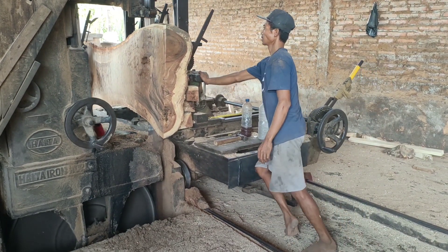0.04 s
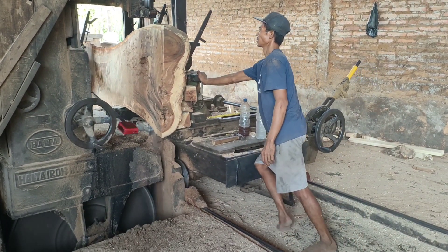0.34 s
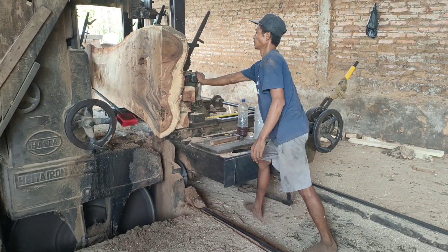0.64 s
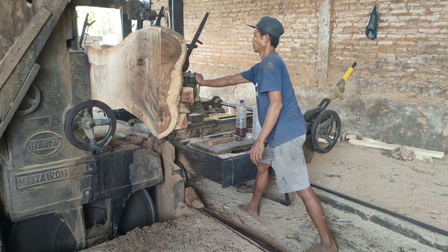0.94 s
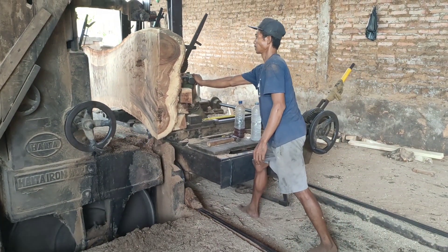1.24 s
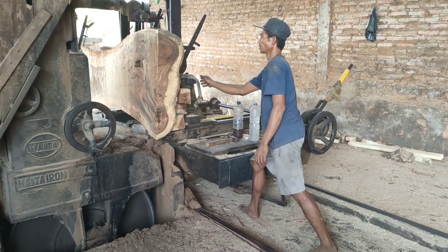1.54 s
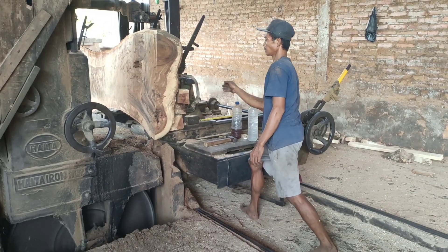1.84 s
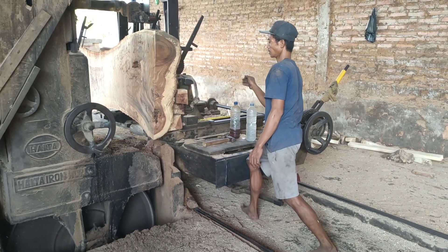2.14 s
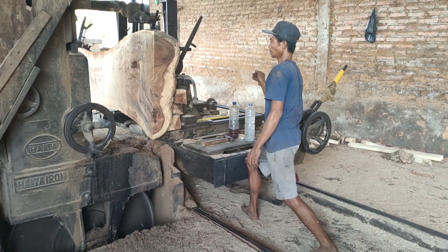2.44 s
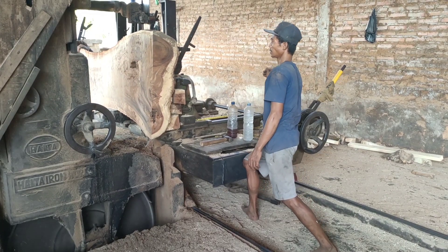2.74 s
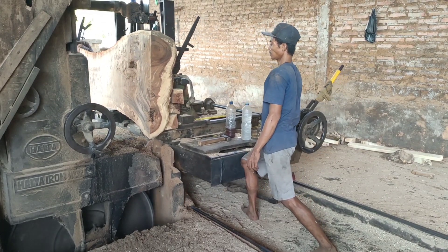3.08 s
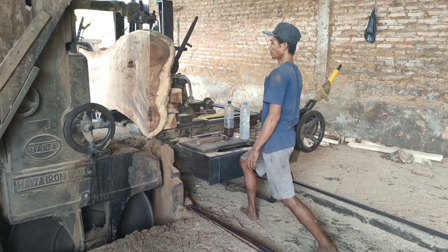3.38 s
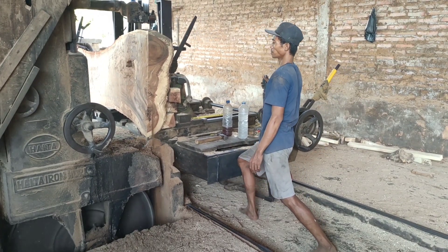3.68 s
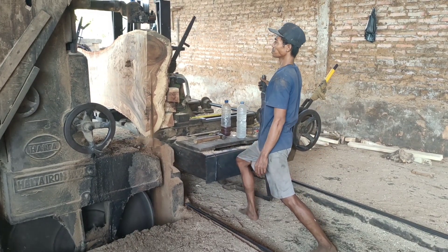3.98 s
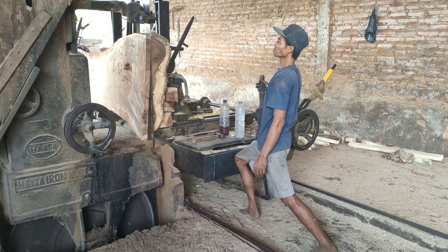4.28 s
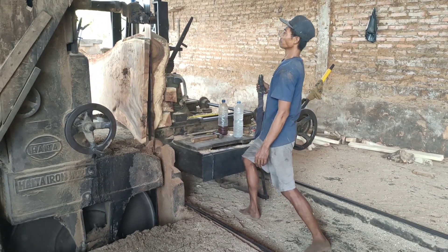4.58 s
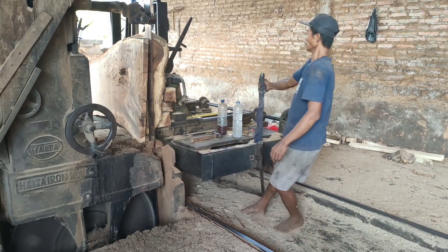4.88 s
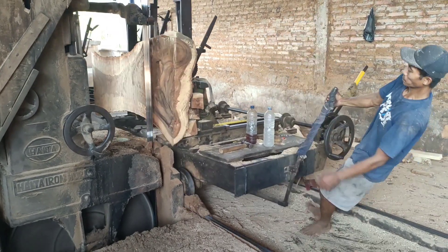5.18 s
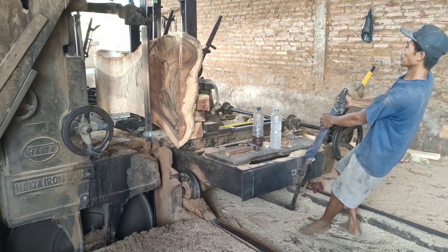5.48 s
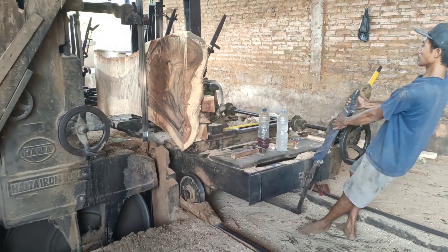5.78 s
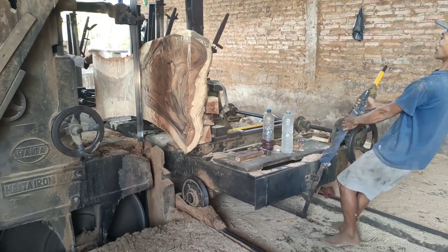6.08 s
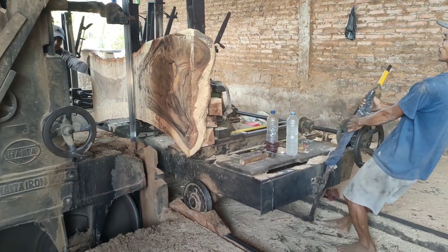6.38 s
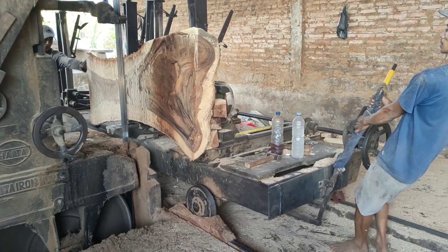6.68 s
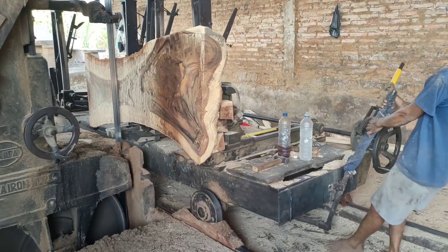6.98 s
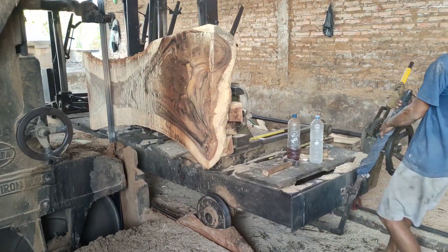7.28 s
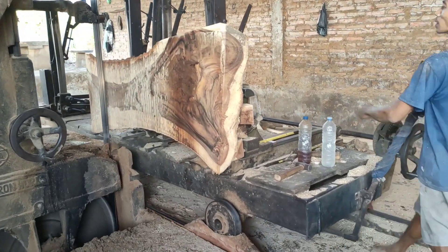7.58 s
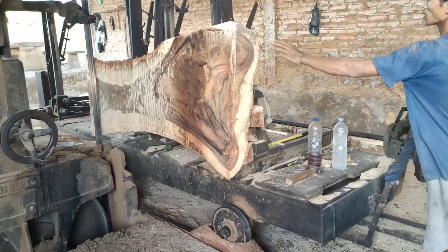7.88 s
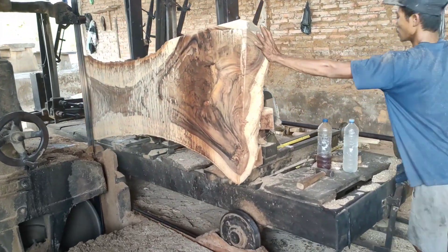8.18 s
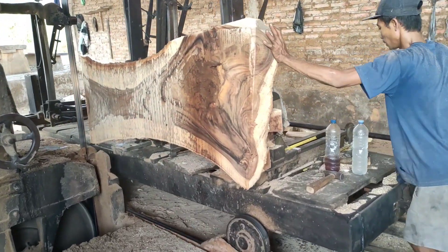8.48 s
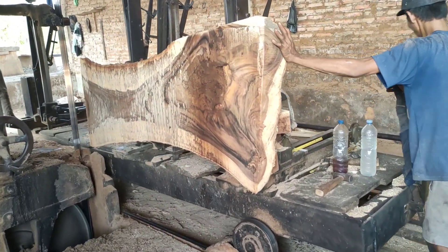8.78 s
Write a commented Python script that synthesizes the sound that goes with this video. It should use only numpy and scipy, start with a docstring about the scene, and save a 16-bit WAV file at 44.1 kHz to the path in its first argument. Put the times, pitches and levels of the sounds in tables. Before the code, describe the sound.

A large band saw hisses and rings through a log over a droning engine, then runs free, slightly faster, inside a shed.

```python
"""Inside a brick shed, at an engine-driven band sawmill; two microphones hear mostly wall reflections.
The steel band rings and hisses through a big log while the loaded engine drones and its exhaust chuffs.
The sound drops out for an instant; then the saw runs free, the engine a little faster and lighter.
The blade rasps in short surges and swishes once per lap, and the log carriage bumps as it rolls back."""
import sys
import numpy as np
from scipy import signal
from scipy.fft import rfft, irfft, next_fast_len
from scipy.io import wavfile
from scipy.ndimage import map_coordinates

SR = 44100
rng = np.random.default_rng(int(sys.argv[2]) if len(sys.argv) > 2 else 0)


def file_out(sig):
    """Save sig as 16-bit WAV at sys.argv[1]."""
    # one column per channel
    cols = np.atleast_2d(sig).T
    # limit, then scale
    lim = np.clip(cols, -1, 1)
    pcm = np.round(lim * 32767).astype(np.int16)
    wavfile.write(sys.argv[1], SR, pcm)


N = 389403
TIME = np.arange(N) / SR
SIZE = next_fast_len(N)
HZ = np.maximum(np.arange(SIZE // 2 + 1) * SR / SIZE, 1)

CUTTING, FREE = 0, 1   # state of the saw: picks a table's cutting or free column
FREE_SPEED = 13.603   # four-stroke cycles per s with no load
LAPS_PER_CYCLE = 0.375   # laps of the band per engine cycle
GAP_START_S, GAP_END_S = 5.027, 5.052   # the dropout

# strong and weak exhaust puffs, in firing order: level/dB
CYLINDER_DB = [0.5, 2.5, 6, 5.5, -1, -2]


def from_db(db):
    """Decibels to gain."""
    return 10 ** (np.asarray(db) / 20)


def rms_one(x):
    """Scale to rms 1."""
    return x / np.sqrt(np.mean(x ** 2) + 1e-20)


def in_time(rows):
    """A curve of (t/s, value) at every sample."""
    return np.interp(TIME, *np.transpose(rows))


def over_hz(rows, column=1):
    """One column of a spectrum at every frequency."""
    rows = np.array(rows)
    return np.interp(np.log(HZ), np.log(rows[:, 0]), rows[:, column])


def above(edge_hz, order):
    """Share of the power that a high-pass lets through."""
    return 1 / (1 + (edge_hz / HZ) ** (2 * order))


def drift(rate_hz):
    """Smooth random wander with rms 1."""
    step = 40   # samples per random value
    pole = np.exp(-2 * np.pi * rate_hz * step / SR)
    slow = signal.lfilter([1], [1, -2 * pole, pole ** 2], rng.standard_normal(N // step + 2002))[2000:]
    return np.interp(np.arange(N) / step, np.arange(len(slow)), rms_one(slow))


def white():
    """Spectrum of white noise at 0 dB per Hz."""
    return rfft(rng.standard_normal(SIZE)) * np.sqrt(SR / 2)


def to_sound(spectra):
    """Left and right spectra to samples."""
    return irfft(spectra, SIZE)[:, :N]


def shed_noise(state, direct_share=0, lead_ms=0):
    """Noise spectra at both microphones: a direct share reaches the left first, the rest is off walls."""
    # stereo width of the shed, side minus mid: f/Hz, cutting/dB, free/dB
    width = [(30, -29, -27), (75, -42, -39), (125, -60, -40), (200, -44, -36), (377, -29, -12),
             (696, -8, -9), (960, 3, 0.5), (1385, 9.5, 9), (1830, 0.5, -0.5), (2400, -0.5, 0),
             (4050, 2.5, 2), (15000, -2.5, -1.5)]
    side = from_db(over_hz(width, column=1 + state))
    walls = (white() + side * white() * [[1], [-1]]) / np.sqrt(1 + side ** 2)
    direct = white() * np.exp(-2j * np.pi * HZ * lead_ms / 1000 * np.array([[0], [1]]))
    return np.sqrt(direct_share) * direct + np.sqrt(1 - direct_share) * walls


def exhaust_puffs(cycle, decay):
    """Envelope of the exhaust: one dying puff per cylinder; rms 1."""
    firing = cycle * len(CYLINDER_DB)
    strength = from_db(CYLINDER_DB)[firing.astype(int) % len(CYLINDER_DB)]
    return rms_one(strength * np.exp(-decay * (firing % 1)))


def rumble(cycle, state, gain_db, chuff, lumpy_db):
    """Wheels, belts and exhaust gas fill the shed with a low roar that chuffs with the firing."""
    # spectrum of the roar: f/Hz, cutting level/dB, free level/dB
    spectrum = [(20, -61.5, -63), (40, -62, -63), (75, -59, -56.5), (110, -59, -60.5), (170, -59, -61),
                (250, -59.5, -61), (350, -59.5, -64), (484, -61.5, -62.5), (636, -62.5, -63.5),
                (900, -62, -57.5)]
    band = np.sqrt(above(22, order=2) * (1 - above(800, order=4)))
    roar = to_sound(shed_noise(state) * from_db(over_hz(spectrum, column=1 + state)) * band)
    chuffing = rms_one(1 + chuff * exhaust_puffs(cycle, decay=0.25))
    return from_db(gain_db + lumpy_db * drift(48)) * roar * chuffing


def rubbing(turns, turns_per_s, level_db, low_hz, high_hz):
    """A rough surface passes the same spot on every turn: one noise pattern, over and over."""
    surface = rng.standard_normal((2, SR))
    position = (turns % 1 * SR / turns_per_s).astype(int)
    spectra = rfft(surface[:, position], SIZE) * np.sqrt(SR / 2)
    band = np.sqrt(above(low_hz, order=6) * (1 - above(high_hz, order=2)))
    return from_db(level_db) * to_sound(spectra * band)


def carriage_bump(at_s, hz, level_db, t60_s):
    """A soft, deep bump as the carriage rolls back: one dying sine."""
    age = np.maximum(TIME - at_s, 0)
    return -np.sin(2 * np.pi * hz * age) * from_db(level_db - 60 * np.minimum(age / t60_s, 3))


def engine_tones(cycle, state, gain_db, waver_db, flutter_db, sway_rad, scatter_rad, wide_hz):
    """Tones near the exhaust pipe's resonance keep step and throb; the walls scatter the other phases."""
    # engine tones: multiple of the cycle rate, cutting level/dB, free level/dB
    engine_orders = [(3, -55.0, -50.8), (4, -49.9, -46.2), (5, -60.5, -47.2), (6, -28.3, -40.1),
                     (7, -52.5, -50.1), (8, -50.0, -48.4), (9, -53.0, -52.0), (10, -47.7, -57.8),
                     (11, -70.0, -49.3), (12, -40.7, -40.6), (13, -40.6, -38.4), (14, -49.9, -47.7),
                     (15, -47.0, -58.1), (16, -50.0, -57.3), (17, -49.6, -49.7), (18, -38.6, -61.1),
                     (19, -48.6, -65.4), (20, -49.1, -55.0), (22, -49.2, -70.0), (23, -55.0, -50.5),
                     (24, -44.6, -54.1), (25, -50.1, -40.1), (26, -45.7, -59.8), (30, -44.5, -48.7),
                     (32, -49.9, -70.0), (36, -53.4, -70.0), (38, -53.4, -68.6), (42, -49.0, -61.2),
                     (44, -48.6, -66.9), (46, -51.3, -58.9), (50, -55, -52), (51, -63, -48.5),
                     (59, -58, -51), (63, -60, -51.5), (67, -63, -52), (69, -49.1, -63.4), (72, -52, -61),
                     (81, -70, -51), (83, -62, -51.5), (88, -51, -56), (95, -65, -52.5)]
    # tone of the belt-driven shaft: same columns
    shaft_orders = [(5.33, -46, -46)]
    pipe_order, pipe_half_width = 12.5, 4   # the resonance, in multiples of the cycle rate
    turn = cycle - np.argmax(CYLINDER_DB) / len(CYLINDER_DB)   # counted from the strongest puff
    out = np.zeros((2, N))
    for order, *db in [*engine_orders, *shaft_orders]:
        loose = 0.25 if order % len(CYLINDER_DB) == 0 and state == CUTTING else 1   # load steadies firing
        off_pipe = min(((order - pipe_order) / pipe_half_width) ** 2, 1)
        stray = off_pipe * scatter_rad * rng.normal() + sway_rad * drift(1.15)
        phase = 2 * np.pi * order * turn + loose * stray
        # higher tones differ more in phase between the microphones
        apart = min((order * FREE_SPEED / wide_hz) ** 2, 0.7) * rng.choice([-1, 1])
        unsteady_db = waver_db * drift(0.51) + flutter_db * drift(7.3)
        level = from_db(gain_db + db[state] + loose * unsteady_db)
        out -= np.sqrt(2) * level / np.cos(apart) * np.cos(phase + [[apart], [-apart]])
    return out


def steel_colour(state, ripple_db, spacing_hz):
    """Gain of the steel's resonances and hollows over a thicket of weak, close modes."""
    # modes of blade, guides and wheels: f/Hz, width/Hz, cutting lift/dB, free lift/dB
    modes = [(1126, 38, 5.5, 6.5), (1294, 115, 3, 6.5), (1810, 99, -1, -1), (1893, 66, 0, 4),
             (2080, 64, 0.5, 4), (2470, 140, 0.5, 4), (2724, 60, 1, 3.5), (3450, 82, 0.5, -6),
             (4520, 110, -5.5, -5), (5740, 250, 2, 7.5), (6820, 100, -1, -9), (6910, 130, 5.5, 9.5)]
    lift_db = sum(db[state] / (1 + (2 * (HZ - hz) / width) ** 2) for hz, width, *db in modes)
    thicket = np.interp(HZ / spacing_hz, np.arange(8192), rng.standard_normal(8192))
    return from_db(lift_db + ripple_db * np.tanh(thicket))


def blade_noise(state):
    """Teeth and guides rub the steel band: spectra of its mid-range ring and the hiss above."""
    # ring of the blade: f/Hz, cutting level/dB, free level/dB
    ring = [(745, -61, -69.5), (920, -57, -61), (1410, -58.5, -60), (1660, -58, -59), (1954, -54, -54),
            (2300, -53.5, -54.5), (2630, -55, -53.5), (3110, -56, -54), (3450, -60, -57),
            (3640, -57, -55.5), (4130, -59.5, -59.5), (4370, -60.5, -60)]
    # hiss of the teeth: same columns
    hiss = [(4870, -62, -60.5), (4980, -64, -65.5), (5300, -66.5, -62), (5600, -64, -66.5),
            (6350, -65.5, -66), (6590, -72.5, -67.5), (7450, -78, -76.5), (7860, -75.5, -71),
            (8240, -79, -76.5), (9540, -83.5, -81), (10420, -78, -76), (11700, -86, -82), (12400, -87, -83),
            (13100, -84, -86), (13800, -91, -82.5), (14400, -96, -87), (15200, -106, -97)]
    # tone colour of the two channels: f/Hz, left minus right/dB
    channel_colour = [(700, 0.5), (1000, -2.5), (1300, -1), (1800, -4), (2300, -4), (2750, -5), (3300, -2),
                      (4300, 3), (5800, 0.5), (7000, -0.5), (7800, -2.5), (9000, -7), (10200, -1.5),
                      (13500, -0.5)]
    colour = from_db(over_hz(sorted(ring + hiss), column=1 + state))
    colour *= steel_colour(state, ripple_db=3.5, spacing_hz=12) * np.sqrt(above(700, order=4))
    channel_gain = from_db(over_hz(channel_colour) / 2 * np.array([[1], [-1]]))
    channel_gain /= np.sqrt(np.mean(channel_gain ** 2, axis=0))
    return shed_noise(state, direct_share=0.22, lead_ms=0.512) * colour * channel_gain


def tearing(per_s, decay_s):
    """Teeth snap wood fibres at random: an envelope of sudden, dying snaps; mean 0, rms 1."""
    snaps = (rng.random(N) < per_s / SR) * rng.uniform(0.42, 1, N)
    envelope = signal.lfilter([1], [1, -np.exp(-1 / (decay_s * SR))], snaps + 1e-18)
    return rms_one(envelope - envelope.mean())


def tension_wobble(x, depth_ms, rate_hz):
    """The band's tension varies, so that its ringing wavers in pitch."""
    at = np.arange(N) + depth_ms / 1000 * SR * drift(rate_hz)
    return np.array([map_coordinates(side, [at], order=5, mode="mirror") for side in x])


def flicker(x, cell_hz, cell_s):
    """The treble flickers: narrow bands swell and fade, each by itself."""
    # depth of the flicker: f/Hz, swing/dB
    depth = [(1000, 4), (1400, 5), (1900, 1.5), (2800, 1.5), (3600, 3), (4600, 5.5), (6000, 5), (7000, 8),
             (13000, 8)]
    hz, s, frames = signal.stft(x, SR, nperseg=1024)
    chance = rng.standard_normal((1024, 1024))
    cells = np.meshgrid(hz / cell_hz, s / cell_s, indexing="ij")
    swing = np.tanh(map_coordinates(chance, cells, order=3, mode="mirror"))
    gain = from_db(np.interp(hz, *np.transpose(depth))[:, None] * swing)
    gain /= np.sqrt(np.mean(gain ** 2, axis=1, keepdims=True))
    return signal.istft(frames * gain, SR)[1][:, :N]


def swells(rows):
    """Brief rises and dips of the blade's level: ring dB and hiss dB at every sample."""
    return sum(np.outer(db, np.exp(-((TIME - s) / half_s) ** 2)) for s, half_s, *db in rows)


def saw(cycle, state, ring_db, hiss_db, flap_db, lap_db, chatter_db, shake_db, rasp_db):
    """The running band: it flaps, its joint comes round, and crank turns and firings jerk the teeth."""
    # edges of the groups of modes: f/Hz
    edges = [800, 1700, 2400, 3300, 4450, 6500, 9500, 20000]
    hiss_from_hz, joint_s = edges[3], 6.82
    noise = blade_noise(state)
    lap = np.cos(2 * np.pi * LAPS_PER_CYCLE * (cycle - np.interp(joint_s, TIME, cycle)))
    shared_db = lap_db * lap + flap_db * drift(26) + rasp_db * tearing(per_s=280, decay_s=0.0071)
    crank_bite = np.exp(-6 * (2 * cycle % 1))   # two crank turns per cycle
    jerk_db = chatter_db * crank_bite + shake_db * exhaust_puffs(cycle, decay=0.87)
    out, remaining = 0, 1
    for low, high in zip(edges, edges[1:]):
        higher = above(high, order=12)
        group_db = ring_db + jerk_db - jerk_db.mean() if low < hiss_from_hz else hiss_db
        patchy_db = 0.5 * drift(22)   # each group flickers by itself
        out = out + to_sound(noise * (remaining - higher)) * from_db(group_db + shared_db + patchy_db)
        remaining = higher
    wavering = tension_wobble(out, depth_ms=0.066, rate_hz=2.9)
    return flicker(wavering, cell_hz=100, cell_s=0.07)


def cutting(cycle):
    """The blade is in the log: the engine works hard and the teeth bite harder on each crank turn."""
    # how hard the engine works: t/s, level/dB
    effort = [(0, -1.7), (0.95, -0.4), (4.25, -1), (4.9, -3)]
    # softer and harder spots in the log: t/s, half length/s, ring/dB, hiss/dB
    grain = [(0.66, 0.045, -1.5, -1.5), (3.47, 0.022, 0.5, -1), (4.49, 0.022, 1, 1),
             (4.665, 0.022, -0.5, 0.3)]
    ring_grain_db, hiss_grain_db = swells(grain)
    ring_db = -0.6 + 0.02 * TIME + ring_grain_db   # both grow towards the open end of the log
    hiss_db = -0.72 + 0.07 * TIME + hiss_grain_db
    engine = engine_tones(cycle, CUTTING, gain_db=0.5, waver_db=0.7, flutter_db=1.1,
                          sway_rad=0.28, scatter_rad=1.58, wide_hz=650)
    roar = rumble(cycle, CUTTING, gain_db=-1.4, chuff=1.0, lumpy_db=1.0)
    drive_growl = rubbing(2 * cycle, 2 * FREE_SPEED, level_db=-69, low_hz=422, high_hz=1170)
    blade = saw(cycle, CUTTING, ring_db, hiss_db,
                flap_db=0.15, lap_db=-0.2, chatter_db=2.4, shake_db=-0.2, rasp_db=0.8)
    return from_db(in_time(effort)) * (engine + roar + drive_growl) + blade


def recovery(depth_db, time_s):
    """After the dropout a level starts low and creeps back, in dB."""
    return -depth_db * np.exp(-np.maximum(TIME - GAP_END_S, 0) / time_s)


def running_free(cycle):
    """Unloaded, the exhaust softens and the fan tone stands out; the blade returns first, bass last."""
    # the blade brushes the returning log or eases: t/s, half length/s, ring/dB, hiss/dB
    brushes = [(5.31, 0.059, 2.7, 2.5), (5.425, 0.04, 2.1, 1.5), (5.54, 0.06, -0.3, -2),
               (5.715, 0.03, 2.5, 1.5), (5.88, 0.036, 2, -0.5), (6.09, 0.025, 1.8, 0.7),
               (6.275, 0.03, 1.7, 1), (6.42, 0.04, 0, 1), (6.53, 0.022, 2.5, 0), (8.07, 0.022, 1, 1.5)]
    age = TIME - GAP_END_S
    ring_brush_db, hiss_brush_db = swells(brushes)
    return_db = recovery(depth_db=4.5, time_s=0.065)
    ring_db = -1 + 0.08 * age + ring_brush_db + return_db
    hiss_db = -0.32 + 0.03 * age + hiss_brush_db + return_db
    engine = engine_tones(cycle, FREE, gain_db=0, waver_db=0.7, flutter_db=1.3,
                          sway_rad=0.23, scatter_rad=2.63, wide_hz=610)
    roar = rumble(cycle, FREE, gain_db=-0.84, chuff=0.068, lumpy_db=1.5)
    guide_scrape = rubbing(LAPS_PER_CYCLE * cycle, LAPS_PER_CYCLE * FREE_SPEED,
                           level_db=-63, low_hz=650, high_hz=1370)
    machine = engine + roar + guide_scrape
    bass = to_sound(rfft(machine, SIZE) * (1 - above(140, order=4)))
    machine += bass * (from_db(recovery(depth_db=30, time_s=0.156)) - 1)
    machine *= from_db(0.26 + recovery(depth_db=5, time_s=0.1))
    blade = saw(cycle, FREE, ring_db, hiss_db,
                flap_db=0.4, lap_db=0.3, chatter_db=0.5, shake_db=0.1, rasp_db=0.21)
    return machine + blade


def dropout(before_db, gap_db, after_db, edge_s):
    """Gain that shuts quickly, stays low for an instant and opens again."""
    half = edge_s / 2
    corners = [GAP_START_S - half, GAP_START_S + half, GAP_END_S - half, GAP_END_S + half]
    return from_db(np.interp(TIME, corners, [before_db, gap_db, gap_db, after_db]))


def scene():
    """Cutting, a brief dropout, then the free-running saw."""
    # the engine labours through the log and picks up near its end: t/s, speed/(cycles per s)
    cut_speed = [(0, 12.64), (0.8, 12.72), (2.0, 12.77), (3.0, 12.69), (3.9, 12.6), (4.9, 12.83)]
    cut_crank, free_crank = 0.94, 0.533   # head start of the crank, in cycles
    in_log = TIME < 5.04
    cycle = np.cumsum(np.where(in_log, in_time(cut_speed), FREE_SPEED)) / SR
    mill = np.where(in_log, cutting(cycle + cut_crank), running_free(cycle + free_crank))
    mill *= dropout(before_db=0.14, gap_db=-37, after_db=-0.23, edge_s=0.0026)
    return mill + carriage_bump(at_s=5.475, hz=38, level_db=-21, t60_s=0.11)


def record(dry):
    """Both microphone channels pass a steep treble cut."""
    cutoff_hz = 15400
    return signal.sosfilt(signal.ellip(12, 0.1, 90, cutoff_hz, fs=SR, output="sos"), dry)


dry = scene()
out = record(dry)
file_out(out)
```